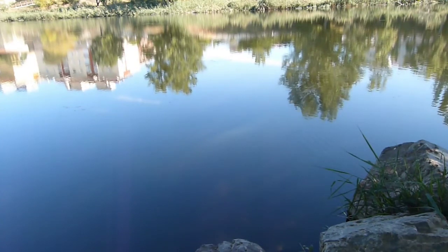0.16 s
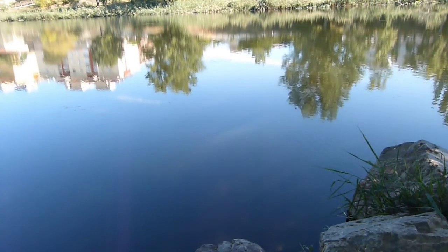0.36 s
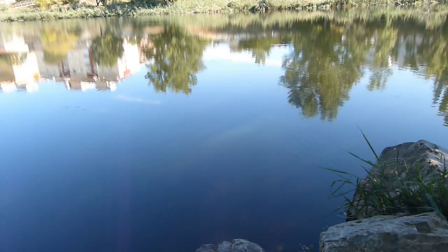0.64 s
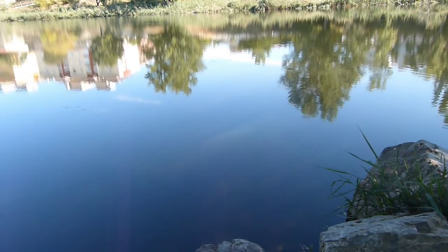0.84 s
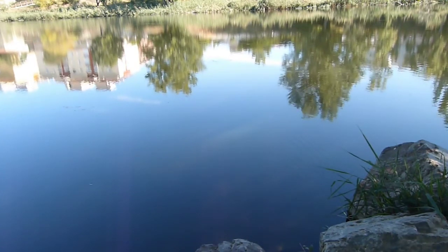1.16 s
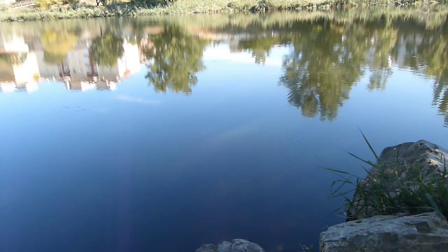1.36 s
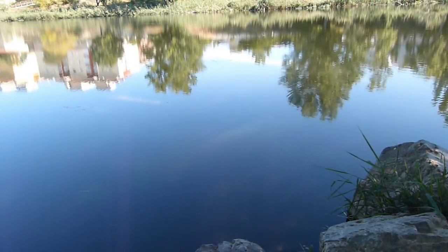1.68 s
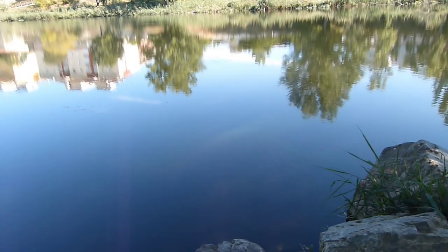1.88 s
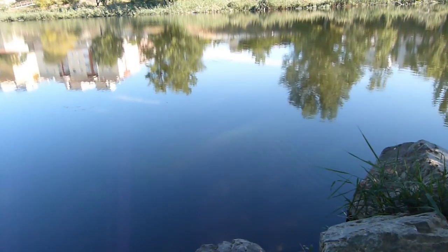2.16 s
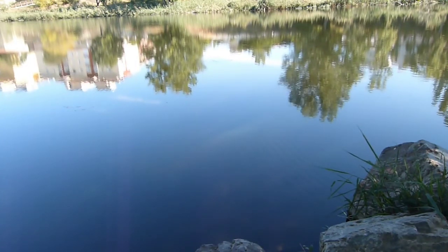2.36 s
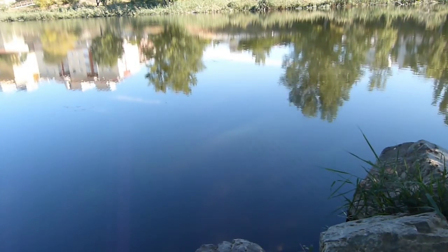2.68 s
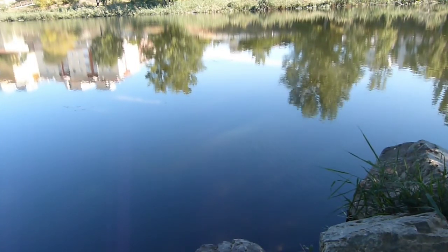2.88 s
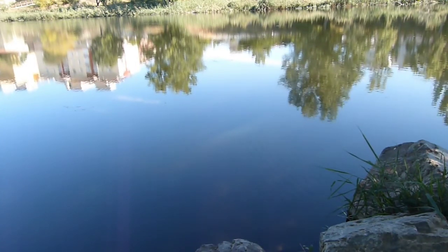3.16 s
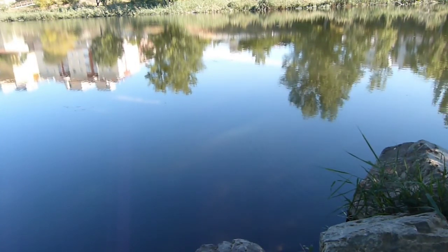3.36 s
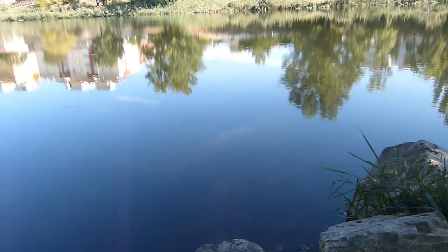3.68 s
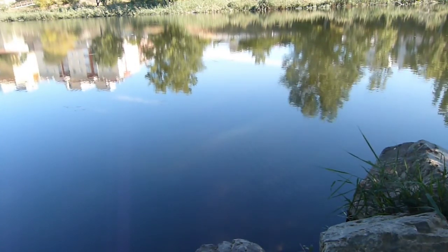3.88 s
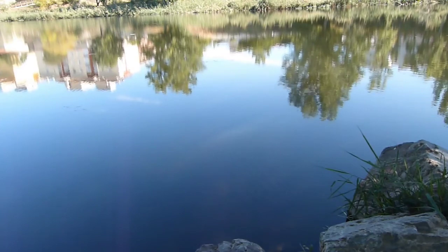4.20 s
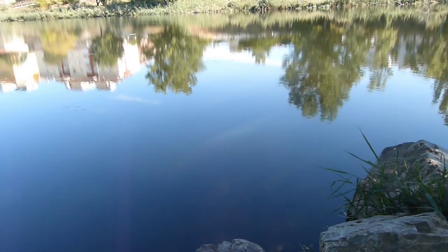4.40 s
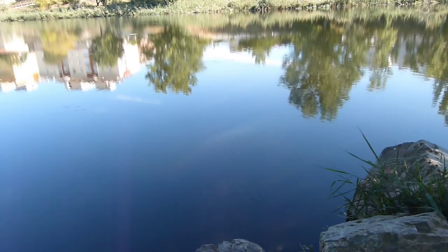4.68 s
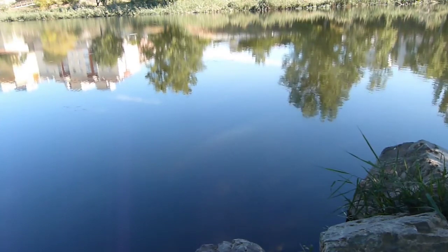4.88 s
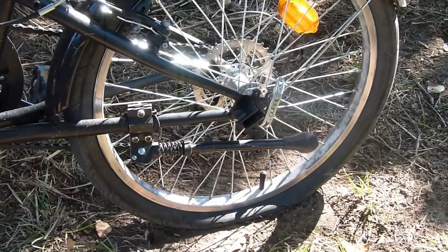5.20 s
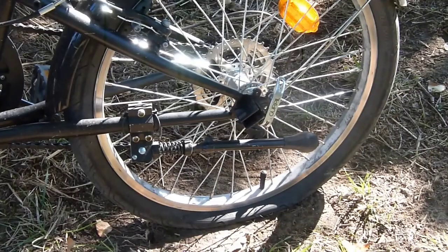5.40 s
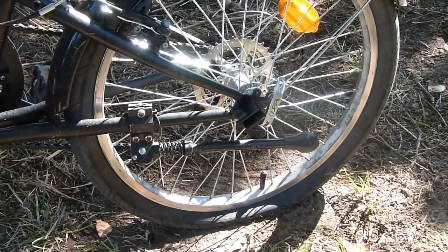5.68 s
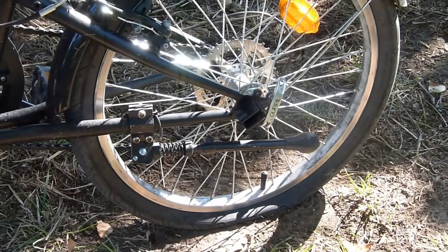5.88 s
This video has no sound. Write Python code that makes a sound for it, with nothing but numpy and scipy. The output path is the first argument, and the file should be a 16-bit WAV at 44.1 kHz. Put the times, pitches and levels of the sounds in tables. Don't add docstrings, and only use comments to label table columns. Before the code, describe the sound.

A smooth, quiet wash of distant weir water and town runs steadily, strongest in the low mids with soft hiss above, leaning slightly left. Dry grass crackles almost inaudibly, with a low brush near 1.4 s and a bright snap at 2.3 s. A leaf-screened bird on the right gives tiny, very high echoing ticks from 0.5 to 0.9 s, then singly at 1.4 and 2.3 s. A nearer bird on the left ticks sharply at 1.0, 1.3 and 3.2 s. From 3.6 to 4.6 s a far bird's lower chips arrive blurred by echoes, with hidden ticks at 3.7, 3.9 and 4.1 s. The loudest near ticks fall at 4.5 and 4.8 s. Total silence lasts from 5.0 to 5.27 s; then the wash returns abruptly, leaning slightly right, with hidden ticks at 5.5, 5.7, 5.76 and 5.9 s and faint grass rustle.

```python
import sys
import numpy as np
from scipy import signal
from scipy.fft import rfft, irfft
from scipy.io import wavfile
from scipy.ndimage import uniform_filter1d

SR = 44100
rng = np.random.default_rng(int(sys.argv[2]) if len(sys.argv) > 2 else 0)


def volts_from_db(level):
    exponent = np.asarray(level, float) / 20
    return 10 ** exponent


def master(y):
    cut = np.clip(np.atleast_2d(y).T, -1, 1)
    pcm = np.round(cut * 32767)
    wavfile.write(sys.argv[1], SR, pcm.astype(np.int16))


N = 266628
SILENCE_START_S, SILENCE_END_S = 5.0135, 5.2743


def evened(x):
    return x / np.sqrt(np.mean(x ** 2) + 1e-20)


def read(points, hz):
    f, *columns = np.transpose(points)
    return np.array([np.interp(np.log(hz + 1), np.log(f + 1), c) for c in columns])[..., None]


def add(mix, start_s, sound):
    part = mix[:, round(start_s * SR):][:, :sound.shape[1]]
    part += sound[:, :part.shape[1]]


def sides(pan_db):
    return volts_from_db(np.array([[pan_db / 2], [-pan_db / 2]]))


# pitch_hz [Hz], level_db [dB per Hz]
WASH_SPECTRUM = [(30, -43.5), (70, -37), (130, -27.5), (210, -10), (290, -4.5), (400, 1), (560, -4.5),
                 (1500, -8.5), (4100, -13.5), (6300, -19.5), (10000, -23.5), (13000, -33.5), (15000, -35.5),
                 (15800, -55.5)]
# pitch_hz [Hz], likeness [0-1], left-right difference before and after
# the turn [dB, dB], phase by which left leads before and after [rad, rad]
PORT_COHERENCE = [(39.4, .3, 8.5, -5, 3, 0.1), (130, 1, -0.5, 1, 0.2, 0.051), (400, 1, 1.1, 1, 0, 0),
                  (700, 0.92, 1.5, -1.5, 0.06, 0.14), (1400, 0.72, 4.5, -2.5, 0.66, .3),
                  (2180, 0.6, 2.5, -3, 1.18, .5), (3400, 0.3, 2, -2.5, 0.64, 0.24),
                  (6200, 0, 1.5, -0.5, 1, 0.22), (15130, 0, 4.5, 1, 2, 0.16)]
# pitch_hz [Hz], level_db [dB]
TURNED_COLOUR = [(100, 5.5), (400, 0), (1000, 2), (4000, 0), (8000, -1), (13000, -11)]


def wash(shot, patchy_db=0.46, swell_db=-0.03):
    frames, hz = N // 256 + 5, np.fft.rfftfreq(1024, 1 / SR)
    a, b, c, d, patches = rng.standard_normal((frames, 513, 5)).T
    patches = uniform_filter1d(patches, size=12, axis=0)
    patches = evened(uniform_filter1d(patches, size=14, axis=1))
    swell = evened(uniform_filter1d(rng.standard_normal(frames), size=24))
    ports = read(PORT_COHERENCE, hz)
    same, lean_db, lead = np.clip(ports[0], 0, 1), ports[1 + shot], ports[3 + shot]
    left = a + 1j * b
    unlike = c + 1j * d
    right = (same * left + np.sqrt(1 - same ** 2) * unlike) * np.exp(-1j * lead)
    z = np.array([left * volts_from_db(lean_db / 2), right / volts_from_db(lean_db / 2)])
    middle = np.sqrt((1 + same * np.cos(lead)) / 2)
    colour_db = read(WASH_SPECTRUM, hz)[0] + shot * read(TURNED_COLOUR, hz)[0]
    z *= volts_from_db(colour_db + patchy_db * patches + swell_db * swell) / middle
    out = signal.istft(z, nperseg=1024, noverlap=768)[1][:, :N]
    level_db = (-42.5, -43)[shot]
    return volts_from_db(level_db) * out / np.sqrt(np.mean(out.mean(0) ** 2))


# start_s [s], hold_s [s], level_db [dB]
STIRRINGS = [
    (.7, 0.31, -62),
    (1.435, .2, -56.5),
    (2.312, .12, -55.5),
    (3.438, .03, -54.5),
    (4.174, 0.018, -56),
    (5.72, 0.063, -57),
]


def stirring(still_db=-61, rise_db_per_s=146.5, settle_db_per_s=108.5):
    t = np.arange(N) / SR
    power = volts_from_db(still_db) ** 2
    for start_s, hold_s, level_db in STIRRINGS:
        rising = rise_db_per_s * np.maximum(start_s - t, 0)
        settling = settle_db_per_s * np.maximum(t - start_s - hold_s, 0)
        power = power + volts_from_db(level_db - rising - settling) ** 2
    return np.sqrt(power)


# pitch_hz [Hz], level_db [dB per Hz]
RUSTLE_COLOUR = [(4000, -34), (7000, 2.5), (11000, -1), (12500, -3.5), (13800, -9.5), (15500, -12)]
# start_s [s], level_db [rms dB], pitch_hz [centre Hz], width_hz [Hz], length_s [s]
GRASS_SNAPS = [
    (.838, -53, 10800, 2700, .004),
    (1.375, -45, 2000, 740, 0.039),
    (2.334, -44, 10600, 2500, .014),
    (2.435, -49, 5000, 3000, 0.0093),
    (1.41, -60.5, 13900, 1600, .26),
]


def grass(per_s=8000, uneven_db=1.5):
    struck = rng.random(N) < per_s / SR
    strength = volts_from_db(uneven_db * np.minimum(rng.exponential(1, N), 4))
    grains = rng.standard_normal((2, N)) * struck * strength
    colour = volts_from_db(read(RUSTLE_COLOUR, np.fft.rfftfreq(N, 1 / SR))[0, :, 0])
    crackle = irfft(rfft(grains + grains[::-1]) * colour, N)
    mix = evened(crackle) * stirring()
    hz = np.fft.rfftfreq(16384, 1 / SR)
    for start_s, level_db, pitch_hz, width_hz, length_s in GRASS_SNAPS:
        band = np.exp(-2 * ((hz - pitch_hz) / width_hz) ** 2)
        burst = evened(irfft(rfft(rng.standard_normal(16384)) * band))[:round(length_s * SR)]
        burst = burst * signal.windows.tukey(len(burst), .6)
        add(mix, start_s, volts_from_db(level_db) * sides(0) * burst)
    return mix


def trees(echo_db, lift_db=0., same=.75):
    delay_s, level_db = np.transpose(echo_db)
    t = np.arange(16000) / SR
    taps = rng.standard_normal((3, len(t))) * (rng.random((3, len(t))) < 3000 / SR)
    same = np.clip(same, 0, 1)
    taps = same * taps[0] + np.sqrt(1 - same ** 2) * taps[1:]
    tail = taps * volts_from_db(np.interp(t, delay_s, level_db + 7.0 + lift_db)) * (t > .002)
    tail[:, 0] = 1
    return tail


def echoed(voices, echoes, lift_db):
    upper, lower = voices
    return (signal.fftconvolve(upper[None], trees(echoes), axes=1)
            + signal.fftconvolve(lower[None], trees(echoes, lift_db), axes=1))


# delay_s [s], level_db [dB]
FAR_ECHOES = [(.003, -13), (.02, -14), (.05, -26), (.35, -90)]
# start_s [s], level_db [peak dB], pitch_hz [Hz]
FAR_CHIPS = [
    (3.569, -44, 3870),
    (3.849, -40, 4200),
    (3.929, -42, 3550),
    (4.039, -39, 3800),
    (4.125, -39.5, 3570),
    (4.207, -35.5, 4050),
    (4.289, -37, 4250),
    (4.369, -36, 4250),
    (4.465, -33.5, 4260),
    (4.585, -40.5, 3900),
]


def far_bird(drop_hz=1500, length_s=.02):
    mix, t = np.zeros((2, N)), np.arange(0, length_s, 1 / SR)
    for start_s, level_db, pitch_hz in FAR_CHIPS:
        falling_hz = pitch_hz + drop_hz * (.5 - t / length_s)
        chip = np.sin(2 * np.pi * np.cumsum(falling_hz) / SR) * np.hanning(len(t))
        heard = signal.fftconvolve(chip[None], trees(FAR_ECHOES, same=0.29), axes=1)
        add(mix, start_s - .009, volts_from_db(level_db - 14) * heard)
    return mix


def tick(upper_hz, lower_hz, lower_db, scoop, rise_s, snap_s, fade_s, octave_db, length_s=.0074):
    t = np.arange(0, length_s, 1 / SR)
    upper = 2 * np.pi * np.cumsum(upper_hz - 1600 * np.exp(-t / rise_s)) / SR
    lower = 2 * np.pi * np.cumsum(lower_hz - scoop * 2200 * np.exp(-t / snap_s)) / SR
    swell = np.sin(np.pi * t / length_s) ** .55
    spent = np.exp(-t / fade_s) * signal.windows.tukey(len(t), .2)
    upper_voice = swell * (np.sin(upper) + volts_from_db(octave_db - 17.5) * np.sin(2 * upper))
    lower_voice = volts_from_db(lower_db) * spent * (np.sin(lower) + volts_from_db(octave_db) * np.sin(2 * lower))
    return upper_voice, lower_voice


# delay_s [s], level_db [dB]
HIDDEN_ECHOES = [(.003, -14.5), (.03, -15), (.06, -21.5), (.12, -28), (.35, -50)]
# start_s [s], level_db [peak dB], upper pitch_hz [Hz], lower pitch_hz [Hz],
# lower voice level_db [dB]
HIDDEN_TICKS = [(0.489, -31.5, 7870, 7090, 1.5), (0.588, -36, 8100, 7180, 7),
                (0.7052, -41, 8430, 7360, 14.5), (0.7315, -39, 8440, 6930, 6),
                (0.778, -35.5, 8500, 7250, 9), (0.9092, -33.5, 8130, 7280, 7), (1.4316, -36, 8450, 7430, 7),
                (2.263, -36.5, 8140, 7470, 7), (3.707, -33, 8070, 7180, 4),
                (3.8754, -34.5, 8500, 7380, 6.5), (4.14, -32.5, 8270, 7410, 3.5),
                (5.5356, -31, 8000, 7020, 5.5), (5.707, -35, 8470, 7360, 9),
                (5.7602, -33.5, 8030, 6960, 5.5), (5.876, -36, 7700, 7070, 11.5)]


def hidden_bird():
    mix = np.zeros((2, N))
    for start_s, level_db, upper_hz, lower_hz, lower_db in HIDDEN_TICKS:
        scoop = np.clip(.7 * (-30.2 - level_db), 0, 1.2)
        voices = tick(upper_hz, lower_hz, lower_db, scoop,
                      rise_s=.0027, snap_s=.0012, fade_s=.02, octave_db=-38)
        heard = echoed(voices, HIDDEN_ECHOES, lift_db=-3.4)
        add(mix, start_s - .0018, volts_from_db(level_db - 13.0) * sides(-2.8) * heard)
    return mix


# delay_s [s], level_db [dB]
NEAR_ECHOES = [(.003, -26), (.02, -28), (.06, -36), (.12, -45), (.35, -69)]
# start_s [s], level_db [peak dB], upper pitch_hz [Hz], lower pitch_hz [Hz],
# lower voice level_db [dB]
NEAR_TICKS = [
    (1.0101, -24, 7710, 6810, -2.5),
    (1.2792, -27.5, 8040, 6800, 0),
    (3.1561, -23.5, 7690, 6720, -6.5),
    (4.5377, -20.5, 8240, 7150, -4.5),
    (4.808, -20, 7580, 6990, -6),
]


def near_bird():
    mix = np.zeros((2, N))
    for start_s, level_db, upper_hz, lower_hz, lower_db in NEAR_TICKS:
        voices = tick(upper_hz, lower_hz, lower_db, scoop=0.84,
                      rise_s=0.0012, snap_s=0.0016, fade_s=0.0072, octave_db=-14.5)
        heard = echoed(voices, NEAR_ECHOES, lift_db=2.0)
        add(mix, start_s - .0013, volts_from_db(level_db - 0.5) * sides(4) * heard)
    return mix


def scene():
    after = np.arange(N) / SR > SILENCE_START_S
    background = np.where(after, wash(shot=1), wash(shot=0))
    return background + grass() + far_bird() + hidden_bird() + near_bird()


def mono_treble(x, keep_db=4.5, mono_hz=6890, before_s=.02, after_s=.035):
    mid, side = (x[0] + x[1]) / 2, (x[0] - x[1]) / 2
    hz, t, z = signal.stft(side, SR, nperseg=2048)
    bands = (abs(z[:1024]) ** 2).reshape(64, 16, -1).mean(1)
    usual = np.median(bands, axis=1)[:, None]
    keep = np.repeat(bands > volts_from_db(2 * keep_db) * usual, 16, axis=0)
    attacks_s = [row[0] for row in NEAR_TICKS] + [SILENCE_END_S + before_s]
    wide = np.any([(t > s - before_s) & (t < s + after_s) for s in attacks_s], axis=0)
    keep |= (hz[:1024, None] < mono_hz) | wide
    side = signal.istft(z * np.vstack([keep, keep[-1:]]), SR, nperseg=2048)[1][:N]
    return np.array([mid + side, mid - side])


def top_cut(x):
    return signal.sosfilt(signal.butter(12, 15790, fs=SR, output="sos"), x)


def record(dry):
    t = np.arange(N) / SR
    edge = signal.firwin(511, 15750, window=("kaiser", 9), fs=SR)
    limited = signal.oaconvolve(mono_treble(dry), edge[None], "same")
    sounding = (t < SILENCE_START_S) | (t > SILENCE_END_S)
    return top_cut(limited * sounding)


dry = scene()
out = record(dry)
master(out)
```